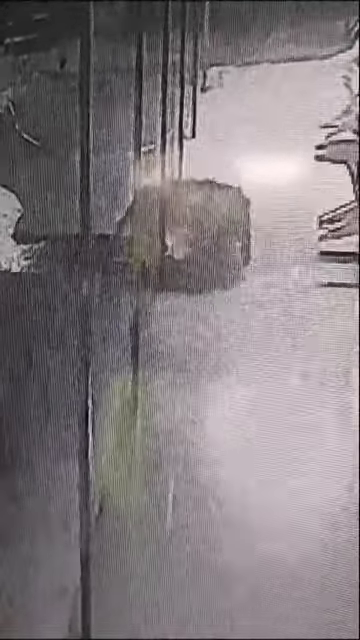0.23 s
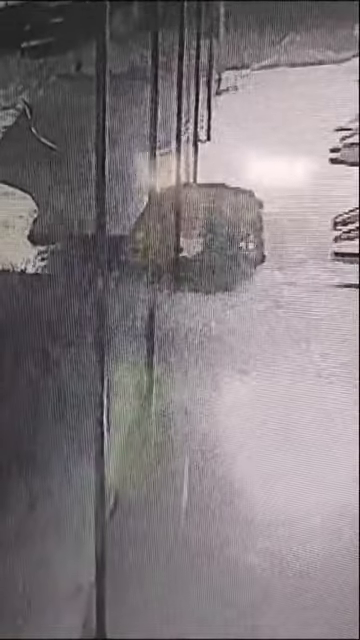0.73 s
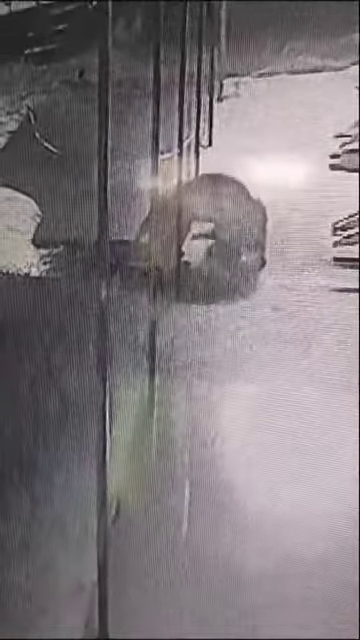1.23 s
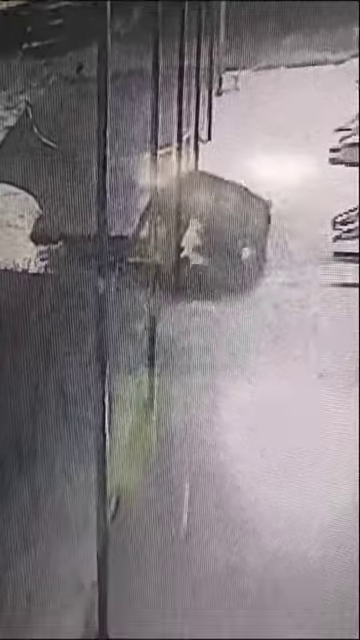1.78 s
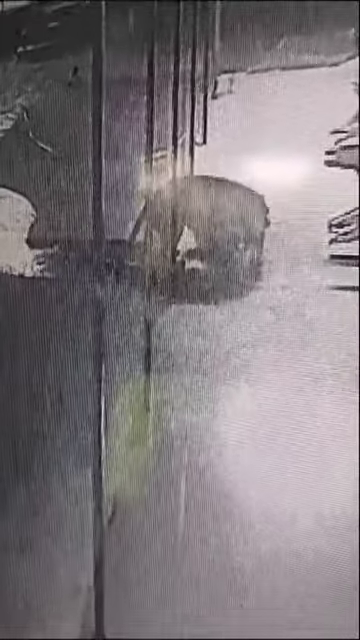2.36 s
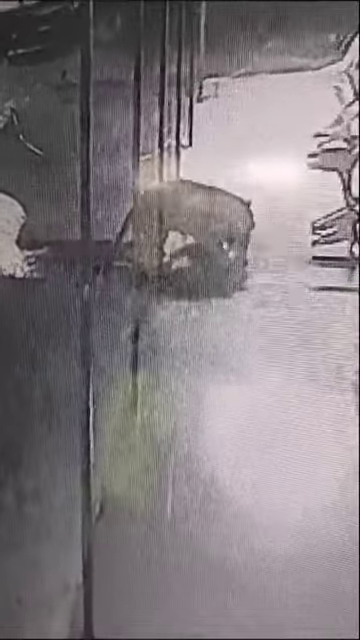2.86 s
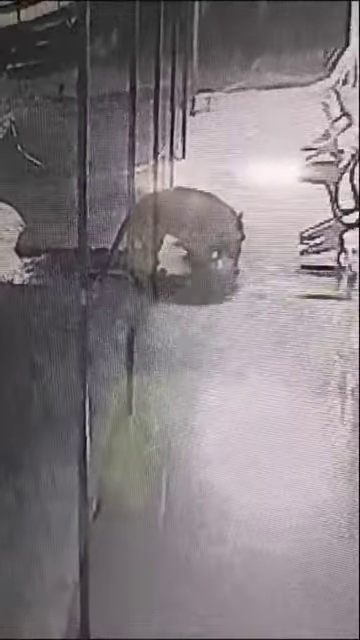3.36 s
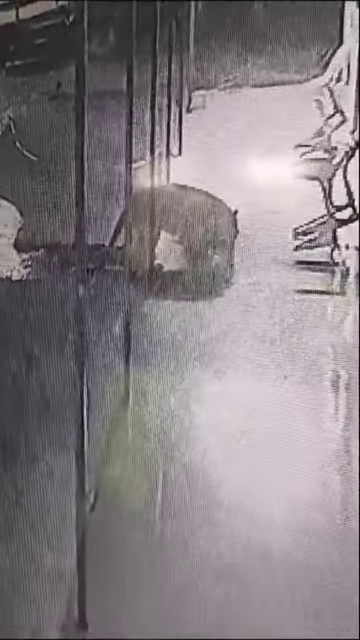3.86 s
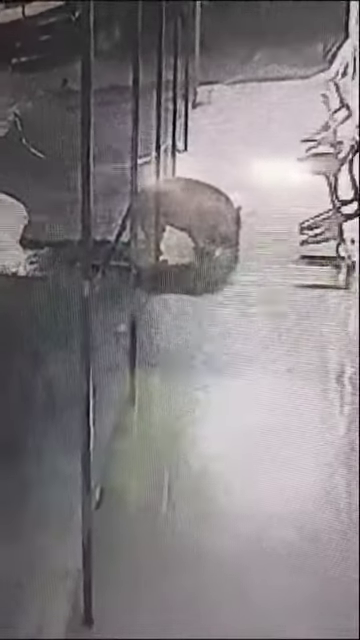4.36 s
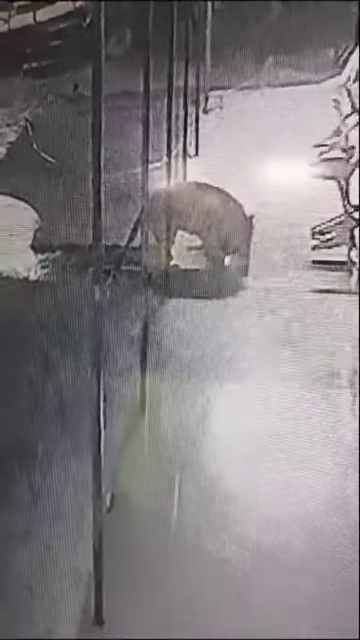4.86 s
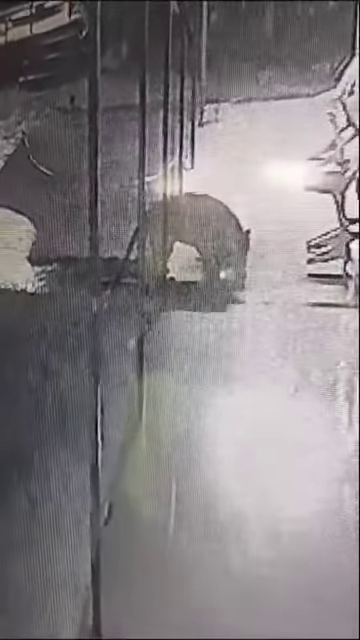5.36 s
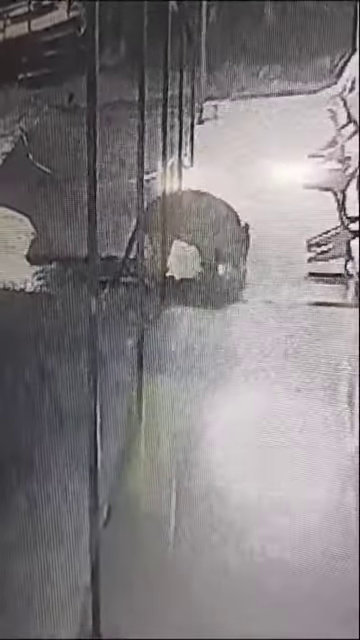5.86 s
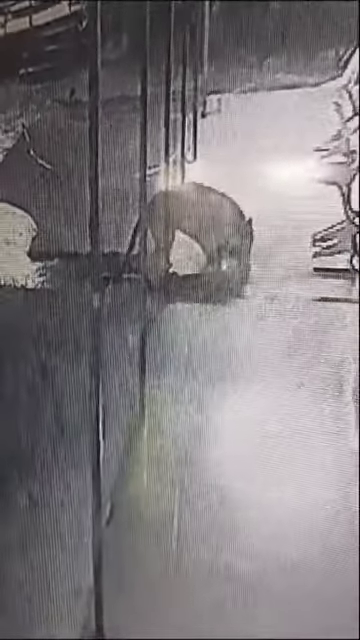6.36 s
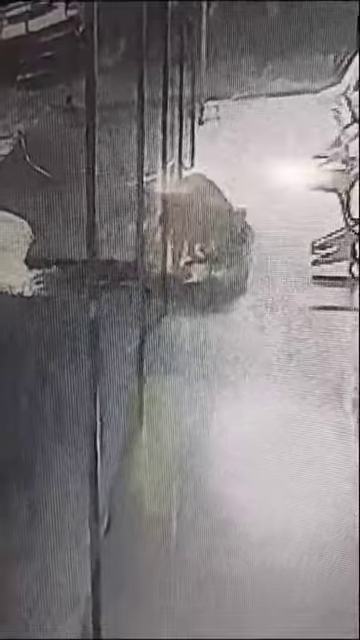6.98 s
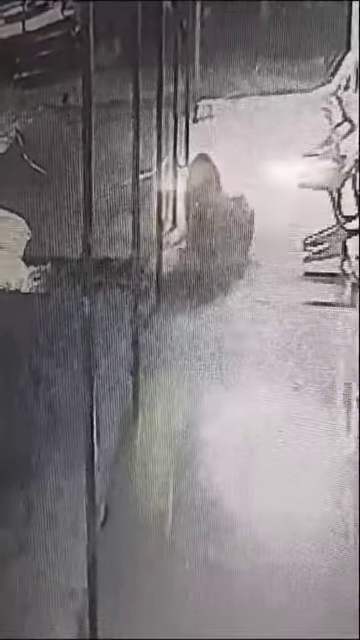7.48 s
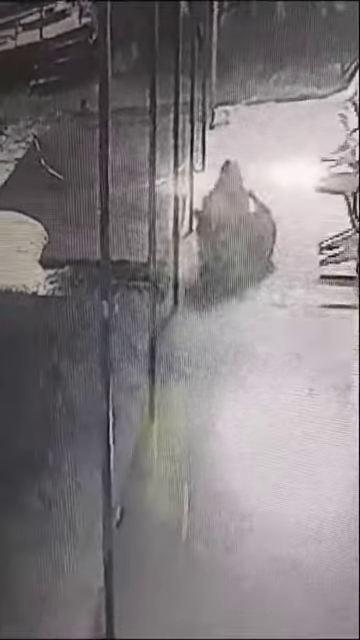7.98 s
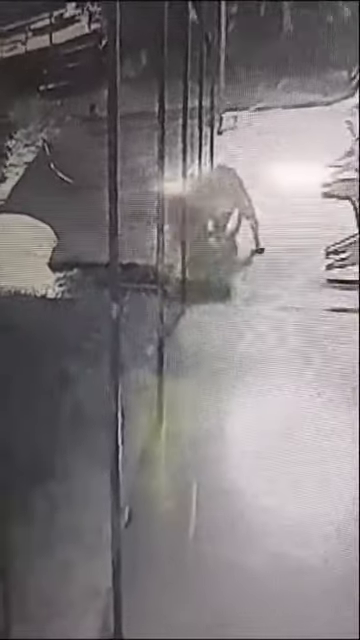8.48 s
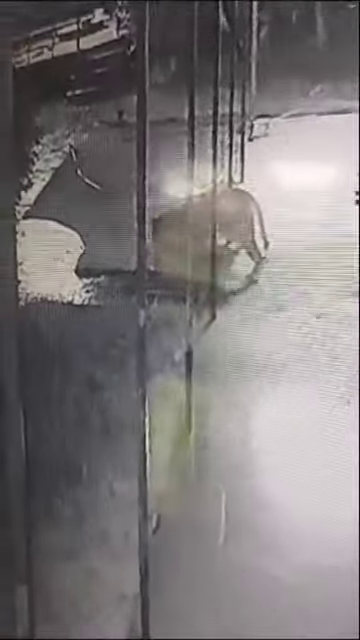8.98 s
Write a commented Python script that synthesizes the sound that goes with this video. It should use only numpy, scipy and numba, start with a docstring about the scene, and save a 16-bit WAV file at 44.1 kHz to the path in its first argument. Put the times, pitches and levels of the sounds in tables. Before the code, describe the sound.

A large wild cat snarls roughly with hiss and spittle in a slightly echoing place. Then, close by, it gives four deep sawing roars, each followed by a rasping in-breath, and ends on a long fading growl. A bird whistles faintly over a low outdoor rumble. Last, a dull security microphone picks up night hiss and two loud, hoarse yelps from a smaller animal.

```python
"""Three scenes joined by fades. First a big cat snarls in an echoing place: slow rough vocal folds, a
booming chest, hiss and spittle. Then it saws close by, roaring on the out-breath and rasping on the
in-breath while a bird whistles, and ends on a long growl. Last, a narrow-band security microphone
hears the night hiss and two hoarse yelps of a smaller animal that overload it.
Both animals' voices are fold pulses and air noise ringing the resonances of the airway."""
import sys
import numpy as np
from scipy import signal
from scipy.fft import rfft, irfft
from scipy.io import wavfile
from scipy.ndimage import uniform_filter1d
from numba import njit

SR = 44100
rng = np.random.default_rng(int(sys.argv[2]) if len(sys.argv) > 2 else 0)


def dump(signal):
    """Clip the signal to [-1, 1] and save it as 16-bit WAV at the path in sys.argv[1]."""
    limited = np.clip(np.atleast_2d(signal).T, -1, 1)
    pcm = np.round(limited * 32767).astype(np.int16)
    wavfile.write(sys.argv[1], SR, pcm)


N = 407043


def undb(db):
    return 10 ** (np.asarray(db) / 20)


def unit(x):
    return x / np.sqrt(np.mean(x ** 2))


def noise():
    return rng.standard_normal(N)


def stereo(mid, side):
    return np.array([mid + side, mid - side])


def play(calls):
    """Calls of (time_s, ...) rows to smooth control curves and a gate open during each call."""
    time_s, *columns = np.concatenate(calls).T
    t = np.arange(N) / SR
    gate = np.any([(t >= call[0][0]) & (t <= call[-1][0]) for call in calls], axis=0)
    curves = [uniform_filter1d(np.interp(t, time_s, c), size=260, mode="nearest") for c in columns]
    return curves, uniform_filter1d(1. * gate, size=300, mode="nearest")


def fade(rows):
    """Gain along (time_s, level_db) rows, silent outside them."""
    (db,), gate = play([rows])
    return gate * undb(db)


def swell(start_s, end_s, first_db, last_db, attack_s, release_s, edge_db):
    """Attack, hold and release as (time_s, level_db) rows."""
    return [(start_s, first_db + edge_db), (start_s + attack_s, first_db),
            (end_s - release_s, last_db), (end_s, last_db + edge_db)]


def wander(rate_hz=10):
    """Slow random drift, rms 1."""
    size = int(SR / rate_hz)
    return unit(uniform_filter1d(uniform_filter1d(noise(), size=size), size=size))


@njit
def bandpass(x, hz, width_hz):
    """State-variable filter, gain 1 at its moving centre."""
    y, band_state, low_state = np.empty(len(x)), 0., 0.
    for i in range(len(x)):
        g, damping = np.tan(np.pi * hz[i] / SR), width_hz[i] / hz[i]
        band = (band_state + g * (x[i] - low_state)) / (1 + g * (g + damping))
        band_state = 2 * band - band_state
        low_state += 2 * g * band
        y[i] = damping * band
    return y


def ring(x, hz, width_hz):
    """Steep resonance; roughly keeps the rms of white input."""
    hz, width_hz = hz + np.zeros(N), width_hz + np.zeros(N)
    once = bandpass(x + 1e-18, hz, width_hz)
    return bandpass(once, hz, width_hz) * np.sqrt(2 * SR / (np.pi * width_hz))


def cavity(x, modes):
    """Parallel (centre_hz, width_hz, gain_db) resonances of alternating sign, power near 1."""
    gains = undb([db for _, _, db in modes])
    bands = ((-1) ** k * gains[k] * ring(x, hz, width) for k, (hz, width, _) in enumerate(modes))
    return sum(bands) / np.linalg.norm(gains)


def restless(modes, scale=1):
    """Scaled mode frequencies drift: tongue and lips never hold still."""
    return [(scale * hz * (1 + .022 * wander()), width, db) for hz, width, db in modes]


@njit
def closures(hz, rough, scatter):
    """One pulse per fold closure, power near 1; roughness varies period and size."""
    pulses, phases = np.zeros(len(hz) + 1), np.empty(len(hz))
    phase, cycle = 0., 0
    for i in range(len(hz)):
        step = hz[i] * np.exp(rough[i] * scatter[cycle, 0]) / SR
        phase += step
        if phase >= 1:
            phase, cycle = phase - 1, cycle + 1
            size = np.exp(rough[i] * scatter[cycle, 1]) * np.sqrt(SR / hz[i])
            pulses[i] += size * phase / step
            pulses[i + 1] += size * (1 - phase / step)
        phases[i] = phase
    return pulses[:-1], phases


def folds(hz, rough, jitter, shimmer):
    """Vocal fold pulses and their cycle phase."""
    scatter = rng.standard_normal((N // 40, 2)) * [jitter, shimmer]
    return closures(hz, rough + np.zeros(N), scatter)


def breathy(pulses, phase, air_share, puff_cycles):
    """Pulses mixed with air noise that puffs once a cycle."""
    air_share = np.clip(air_share, 0, 1)
    puffs = unit(np.exp(-phase / puff_cycles) * noise())
    return np.sqrt(1 - air_share) * pulses + np.sqrt(air_share) * puffs


def uneven(phase, scatter_db=2.2):
    """A random gain per fold cycle."""
    cycle = np.cumsum(np.diff(phase, prepend=0) < 0)
    return undb(scatter_db * rng.standard_normal(N // 40))[cycle]


def taps(time_s, level_db):
    """One impulse per event."""
    x = np.zeros(N)
    x[(time_s * SR).astype(int)] = undb(level_db)
    return x


def pops(events, rise_s, fall_s):
    """Short wet noise bursts, and the bright frequency of the latest one."""
    time_s, level_db, bright_hz = np.transpose(events)
    t = np.arange(SR // 20) / SR
    shape = (1 - np.exp(-t / rise_s)) * np.exp(-t / fall_s)
    bursts = signal.fftconvolve(taps(time_s, level_db), shape)[:N] * noise()
    latest = np.maximum(np.searchsorted(time_s, np.arange(N) / SR) - 1, 0)
    return bursts, bright_hz[latest]


def glides(notes, peak_share, edge_db):
    """Sliding pure tones, loudest at peak_share of their length."""
    calls = []
    for start_s, end_s, from_hz, to_hz, db in notes:
        peak = (start_s + peak_share * (end_s - start_s), from_hz + peak_share * (to_hz - from_hz), db)
        calls.append([(start_s, from_hz, db + edge_db), peak, (end_s, to_hz, db + edge_db)])
    (hz, db), gate = play(calls)
    return gate * undb(db) * np.sqrt(2) * np.sin(2 * np.pi * np.cumsum(hz) / SR)


def coloured(spectrum):
    """Steady noise of the given spectrum, rms 1."""
    hz, db = np.transpose(spectrum)
    bin_hz = np.maximum(np.arange(N // 2 + 1) * SR / N, 1)
    gain = undb(np.interp(np.log(bin_hz), np.log(hz), db))
    return unit(irfft(rfft(noise()) * gain, N))


def echoes(x, t60_s):
    """Decaying wash of reflections, power gain 1."""
    t = np.arange(SR // 2) / SR
    tail = rng.standard_normal(len(t)) * undb(-60 * t / t60_s)
    return signal.fftconvolve(x, tail / np.linalg.norm(tail))[:N]


# Snarled breaths: start_s, end_s, voice_db, hiss_db,
# cheek_re_voice_db, mouth_re_voice_db, teeth_re_voice_db, top_re_hiss_db
SNARL_BREATHS = [(-.04, 0.516, -12, -25.5, -9, -0.86, -10.5, .5),
                 (0.543, 1.162, -15.5, -28.5, -5.5, -0.64, -9.5, 2),
                 (1.19, 1.75, -27, -28, -5.5, -1.57, -8.5, -5)]


def snarl_breaths():
    """The six level curves: each breath starts hard, sags and lets go."""
    voice, hiss, balance = [], [], []
    timing = dict(attack_s=.018, release_s=.075)
    voice_sag_db_per_s, hiss_sag_db_per_s = 16, 13
    for start_s, end_s, voice_db, hiss_db, *balance_db in SNARL_BREATHS:
        voice_end_db = voice_db - voice_sag_db_per_s * (end_s - start_s)
        hiss_end_db = hiss_db - hiss_sag_db_per_s * (end_s - start_s)
        voice.append(swell(start_s, end_s, voice_db, voice_end_db, edge_db=-11, **timing))
        hiss.append(swell(start_s, end_s, hiss_db, hiss_end_db, edge_db=-18, **timing))
        balance.append([(start_s, *balance_db), (end_s, *balance_db)])
    return [curve for calls in (voice, hiss, balance) for curve in play(calls)[0]]


# Chest under the snarl: time_s, fold_hz, chest_db, neck_db
SNARL_CHEST = [(0, 43.86, -21.5, -13.5), (.112, 44.3, -44, -10), (.23, 44.7, -2.5, -10),
               (.32, 44.08, -10.5, -14.5), (.45, 41.03, -15, -13.5), (.66, 48.67, -12.5, -25.5),
               (.76, 49.4, -19, -19), (.89, 45.68, -45.5, -27.5), (1.35, 44.34, -36, -27.5),
               (1.735, 42.5, -51, -27)]
# Throat opening and closing: time_s, lower_hz, upper_hz, lower_re_voice_db, upper_re_voice_db
SNARL_THROAT = [(0, 179, 378, -4, -1), (.2, 181, 383, -5, 2), (.42, 169, 425, -7.5, -2.5),
                (.56, 190, 335, -3.5, -5), (.72, 195, 303, 0, -4.5), (.88, 202, 277, 4, -13),
                (1.03, 162, 290, -2, -5.5), (1.3, 174, 302.8, -6.5, -6)]
# Teeth and hiss resonances: centre_hz, width_hz, gain_db
TEETH_MODES = [(1119, 110, 14.5), (1522, 210, 18), (1883, 480, 17.5), (2700, 840, 11.5)]
HISS_MODES = [(3310, 810, -4), (4170, 750, -2), (4950, 910, -6.5), (6750, 2100, -1.5), (7650, 850, -5),
              (8600, 7500, 3.5), (12800, 12000, 0)]
# Fade-out: time_s, gain_db
SNARL_FADE = [(0, -1), (1.35, 0), (1.53, -6), (1.7, -24.5), (1.735, -45)]


def snarl():
    """Slow rough folds under a rush of air; the chest booms at the fold rate."""
    (fold_hz, chest_db, neck_db), _ = play([SNARL_CHEST])
    (lower_hz, upper_hz, lower_db, upper_db), _ = play([SNARL_THROAT])
    voice_db, hiss_db, cheek_db, mouth_db, teeth_db, top_db = snarl_breaths()
    pulses, phase = folds(fold_hz, rough=1, jitter=.0376, shimmer=.038)
    voiced = breathy(pulses, phase, air_share=.65, puff_cycles=.44)
    airy = breathy(pulses, phase, air_share=.91, puff_cycles=2)
    chest = undb(chest_db) * np.sqrt(2) * np.sin(2 * np.pi * phase)
    neck = undb(neck_db) * ring(voiced, 101, 69)
    throat = undb(lower_db) * ring(voiced, lower_hz, 55) + undb(upper_db) * ring(airy, upper_hz, 157)
    cheek = undb(cheek_db) * ring(airy, 646, 80)
    mouth = undb(mouth_db) * (.29 * ring(airy, 874, 81) + .5 * ring(airy, 895, 260))
    teeth = undb(teeth_db) * cavity(airy, restless(TEETH_MODES))
    voice = undb(voice_db) * (throat + cheek + mouth + teeth) + neck
    hiss = undb(hiss_db - 2) * cavity(noise(), restless(HISS_MODES[:5])) + spittle()
    top = undb(hiss_db + top_db - 3) * cavity(noise(), HISS_MODES[5:])
    to_walls = undb(-6) * voice + undb(-11) * chest + undb(-12) * hiss + undb(-16) * top
    return fade(SNARL_FADE) * stereo(chest + voice + hiss + top, echoes(to_walls, t60_s=.17))


# Spittle crackles: time_s, level_db, bright_hz
SPITS = [(0.1246, -9.5, 7450), (0.1744, -11, 4070), (0.198, -8, 3870), (0.2219, -10, 7400),
         (0.248, -14.5, 3750), (0.2742, -12.5, 3830), (0.3004, -8.5, 6700), (0.334, -17, 8150),
         (0.3565, -19.5, 3624), (0.389, -11.5, 5430), (0.4125, -9.5, 4080), (0.448, -14, 5340),
         (0.59, -14, 6504), (1.1992, -45, 6896), (1.2176, -16, 7300)]


def spittle():
    """Crackles between the teeth, each with its own colour."""
    bursts, bright_hz = pops(SPITS, rise_s=.0009, fall_s=.0059)
    return .5 * ring(bursts, bright_hz, 550) + .53 * cavity(bursts, HISS_MODES)


# Background level: time_s, level_db
YARD_FADE = [(1.73, -76), (1.8, -47), (5.8, -42.5), (6.3, -42), (6.62, -62.5)]
# Background spectrum: freq_hz, density_db
YARD_SPECTRUM = [(18, -62), (30, -3.5), (164, -6.5), (299, -20.5), (379, -15.5), (897, -22), (1080, -24),
                 (2180, -30.5), (2490, -33), (7460, -37.5), (15500, -40)]


def yard():
    """Low rumble with a faint wide hiss behind the sawing."""
    rumble = coloured(YARD_SPECTRUM)
    hiss = undb(-13) * cavity(noise(), [(400, 900, .5), (6300, 4000, 2)])
    return fade(YARD_FADE) * stereo(rumble, hiss)


# Out-breath roars: start_s, length_s, attack_s, throat_db, full_pull_fold_hz, mouth_re_throat_db
ROARS = [(1.743, 0.27, .045, -23, 62.88, -11), (2.443, .36, .012, -7, 68.38, -8),
         (3.253, 0.36, 0.0093, -7, 63.48, -13), (4.129, .39, .01, -7, 65.64, -12)]
# Course after the attack: time_share, effort_db, fold_pull, roughness, rasp_db, air_db
ROAR_SHAPE = [(0, -1, .82, .5, -24.5, -33.5), (.22, 0.5, .99, .3, -28.5, -32),
              (.48, -0.4, .82, .3, -23.5, -28.5), (.74, -4.5, .3, .5, -27, -38.5),
              (.95, -18, .05, .5, -29, -40), (1.12, -48, .01, .5, -26, -34)]


def roars():
    """Calls for cat_voice: tight folds beat faster and lift throat, mouth and palate, then slacken."""
    share, effort_db, pull, rough, rasp_db, air_db = np.transpose(ROAR_SHAPE[:1] + ROAR_SHAPE)
    effort_db[0] = -17.5  # foot of the attack
    slack_hz, teeth_hz, droop = 40.14, 3642, 0
    throat_hz, mouth_hz, palate_hz = 148.8 + 60.3 * pull, 578.7 + 88.3 * pull, 1581 + 90 * pull
    calls = []
    for start_s, length_s, attack_s, db, tight_hz, mouth_re_throat_db in ROARS:
        time_s = np.r_[start_s, start_s + attack_s + (length_s - attack_s) * share[1:]]
        fold_hz = slack_hz + (tight_hz - slack_hz) * pull
        throat_db = db + effort_db
        mouth_db = db + mouth_re_throat_db + 1.78 * effort_db
        columns = np.broadcast_arrays(time_s, fold_hz, rough, droop, throat_db, throat_hz, mouth_db,
                                      mouth_hz, throat_db + rasp_db, palate_hz, teeth_hz,
                                      throat_db + air_db)
        calls.append(np.transpose(columns))
    return calls


# Palate and teeth resonances: freq_ratio, width_hz, gain_db
PALATE_RATIOS = [(.8, 128.6, 0.5), (1.004, 118, 9), (1.26, 180, 10), (1.469, 191, 1)]
TEETH_RATIOS = [(0.819, 322, -8), (1.002, 368, -1.5), (1.19, 370.4, -10)]
# Leaking air: centre_hz, width_hz, gain_db
AIR_MODES = [(4990, 1140, -1), (7550, 2300, -6.5), (12100, 11000, -15)]
# Puff of air in the growl: time_s, level_db
SNORT = [(6.12, -52), (6.15, -36), (6.19, -69)]


def cat_voice(calls):
    """Fold pulses ring chest, throat, mouth, palate and teeth; air leaks past rough folds."""
    (fold_hz, rough, droop, throat_db, throat_hz, mouth_db, mouth_hz,
     rasp_db, palate_hz, teeth_hz, air_db), gate = play(calls)
    pulses, phase = folds(fold_hz, rough, jitter=.16, shimmer=.6)
    voiced = breathy(pulses, phase, air_share=.81 * rough, puff_cycles=1)
    airy = breathy(pulses, phase, air_share=.2 + 2 * rough, puff_cycles=.55)
    # A drooping head lowers and damps the throat, opens the chest and muffles the palate.
    drooped_hz = throat_hz * (1 - .4 * droop)
    throat = undb(-22) * ring(ring(voiced, drooped_hz, 60 + 40 * droop), drooped_hz, 190)
    chest = undb(-23 + 3.3 * droop) * ring(voiced, 77.5, 59)
    mouth = undb(.5 - 35 * droop + 2.5 * wander()) * ring(voiced, mouth_hz, 86)
    mouth += .8 * droop * ring(voiced, 805, 75) + .27 * ring(airy, 422, 160) + .52 * ring(airy, 840, 370)
    palate = undb(-7 * droop) * cavity(uneven(phase) * airy, restless(PALATE_RATIOS, palate_hz))
    teeth = undb(-3 + 8.1 * droop) * cavity(uneven(phase) * airy, restless(TEETH_RATIOS, teeth_hz))
    ticks = undb(-13.5) * ring(uneven(phase) * pulses, 2600, 2700)
    rasp = palate + teeth + ticks + undb(-6) * ring(airy, 1150, 500)
    air = cavity(breathy(pulses, phase, air_share=.9, puff_cycles=1), AIR_MODES)
    voice = undb(throat_db) * (throat + chest) + undb(mouth_db) * mouth + undb(rasp_db) * rasp
    return gate * (voice + (undb(air_db) + fade(SNORT)) * air)


# In-breaths: start_s, end_s, first_db, last_db
GASPS = [(2.135, 2.433, -15.5, -6), (2.92, 3.246, -14.5, -6.5), (3.785, 4.107, -15, -6),
         (4.797, 5.281, -20, -22)]
# In-breath resonances: centre_hz, width_hz, gain_db
GASP_THROAT = [(78, 34, -9.5), (159, 54.4, 1.5), (295, 51, -15.5)]
GASP_MOUTH = [(611, 98, 3.5), (884, 170, -7.5)]
GASP_RASP = [(1420, 470, -9.5), (2070, 1040, 5), (3190, 350, -19.5), (3700, 620, -2.5), (5090, 880, -6),
             (7360, 3600, -10), (12000, 5000, -32)]
# Slack folds slapping shut: time_s, level_db
FOLD_SLAPS = [(2.089, -17.5), (2.168, -11), (2.177, -7), (2.227, -3.5), (2.301, -23), (2.347, -7),
              (2.867, -15), (2.954, -3), (3.004, -3), (3.053, -4), (3.107, -3), (3.13, 3), (3.149, -2),
              (3.187, -14), (3.799, -11), (3.828, -5), (3.877, -6), (3.955, 0.5), (3.997, -0.5),
              (4.041, -2), (4.821, -8.5), (4.833, -8), (4.91, -11), (4.976, -5.5), (5.038, -7),
              (5.093, -14.5), (5.159, -32), (5.187, -7)]


def gasps():
    """Air drawn in flutters the slack folds unevenly; the hardest slaps ring the throat."""
    (effort_db,), gate = play([swell(*row, attack_s=.018, release_s=.059, edge_db=-22) for row in GASPS])
    pulses, phase = folds(hz=np.full(N, 38.), rough=.99, jitter=.37, shimmer=.64)
    air = breathy(pulses, phase, air_share=.92, puff_cycles=.79)
    throat = undb(effort_db - 9.5) * cavity(air, GASP_THROAT)
    mouth = undb(1.53 * effort_db - 18) * cavity(air, GASP_MOUTH)
    rasp = undb(1.14 * effort_db - 29.5) * cavity(air, GASP_RASP)
    impacts = taps(*np.transpose(FOLD_SLAPS))
    slaps = undb(15.5) * cavity(impacts, GASP_THROAT) + undb(-8.5) * cavity(impacts, GASP_MOUTH)
    return gate * (throat + mouth + rasp) + slaps


# Wet clicks: time_s, level_db, bright_hz
MOUTH_CLICKS = [(2.3008, -17.5, 2100), (2.7708, -26, 1900), (2.9442, -33, 2182), (3.0445, -40, 2460),
                (3.1492, -36, 1800), (3.1914, -27.5, 2370), (3.914, -23, 2426), (4.0003, -28, 2074),
                (4.0387, -18.5, 3742), (4.8135, -40.5, 5200), (4.8978, -25, 2200), (4.9667, -25, 2070),
                (5.0265, -42, 5200), (5.0913, -36, 1930), (5.1275, -39, 2170)]


def mouth_clicks():
    """Wet bursts ring the mouth, each with its own bright band."""
    bursts, bright_hz = pops(MOUTH_CLICKS, rise_s=.0003, fall_s=.0049)
    mouth = .27 * cavity(bursts, GASP_RASP) + .15 * cavity(bursts, GASP_MOUTH)
    return .88 * ring(bursts, bright_hz, 600) + mouth


# Bird notes: start_s, end_s, from_hz, to_hz, level_db
BIRD_NOTES = [(2.35, 2.42, 4600, 3600, -50), (2.795, 2.88, 4400, 3050, -53), (4.667, 4.72, 4450, 4680, -54),
              (4.732, 4.795, 4250, 3350, -56), (5.25, 5.297, 2550, 4100, -41),
              (5.297, 5.316, 4000, 3600, -38), (5.316, 5.338, 3600, 4100, -36),
              (5.346, 5.4, 4000, 2420, -41), (5.41, 5.45, 2900, 4000, -45), (5.85, 5.89, 4580, 4850, -56),
              (6.25, 6.285, 4350, 4660, -58), (6.285, 6.35, 4660, 3860, -58), (6.51, 6.55, 2900, 3200, -60)]


def bird():
    """Thin gliding whistles that waver in level."""
    return glides(BIRD_NOTES, peak_share=.3, edge_db=-9.5) * undb(2.5 + 2.5 * wander())


# Long growl: time_s, fold_hz, throat_db, throat_hz, head_droop, jaw_closure, roughness
GROWL = [(5.322, 39.58, -28.5, 172, .02, 0.13, .25), (5.372, 40, -13.5, 192.5, 0.01, .01, 0.3),
         (5.516, 45.1, -10.5, 186, 0.09, 0.01, 0.13), (5.618, 45.85, -11, 170.5, 0.01, 0.1, 0.12),
         (5.77, 42.13, -15, 157, .25, 0.24, .16), (5.914, 38.58, -20, 146, 0.4, .5, .12),
         (6.11, 36.65, -21, 151.7, 0.55, 0.44, .14), (6.264, 34.45, -26, 151.8, 0.53, 0.65, .16),
         (6.486, 37.43, -34.5, 167.2, 0.08, 1, 0.21), (6.618, 38.26, -51, 183, 0.05, .99, 0.1)]


def growl():
    """Call for cat_voice: the closing jaw dims and lowers the mouth's resonance and shifts the rasp."""
    time_s, fold_hz, throat_db, throat_hz, droop, jaw, rough = np.transpose(GROWL)
    mouth_db, rasp_db, air_db = throat_db - 12.5 - 19 * jaw, throat_db - 19.5, throat_db - 37
    mouth_hz, palate_hz, teeth_hz = 656 - 200 * jaw, 1669 + 170 * jaw, 3642 - 520 * jaw ** 3
    return np.transpose([time_s, fold_hz, rough, droop, throat_db, throat_hz, mouth_db, mouth_hz,
                         rasp_db, palate_hz, teeth_hz, air_db])


# Night level: time_s, level_db
NIGHT_FADE = [(6.64, -67), (6.75, -46), (7.26, -31.5), (7.54, -36), (8.85, -35), (9.23, -37)]
# Night spectrum: freq_hz, density_db
NIGHT_SPECTRUM = [(15, -22), (25, -11), (55, 2), (128, -5.5), (159, 5), (192, -8), (232, -7), (461, -11.5),
                  (598, -18.5), (6550, -30), (7200, -34.5), (9360, -84), (15800, -120)]


def night():
    """Hiss and a faint wavering hum."""
    hum = undb(-14) * ring(noise(), hz=157, width_hz=10)
    return fade(NIGHT_FADE) * (coloured(NIGHT_SPECTRUM) + hum)


def yelp_part(start_s, peak_s, end_s, from_hz, to_hz, peak_db, rise_db, settled_hz, upper_re_db, rough):
    """Swells as the mouth settles, then dies; the upper resonance comes late and lasts longer."""
    mouth_fall_db_per_s, upper_fall_db_per_s = 251, 167
    time_s, fall_s = [start_s, peak_s, end_s], end_s - peak_s
    fold_hz = np.interp(time_s, [start_s, end_s], [from_hz, to_hz])
    mouth_db = peak_db - np.array([rise_db, 0, mouth_fall_db_per_s * fall_s])
    upper_db = peak_db + upper_re_db - np.array([rise_db + 13, 0, upper_fall_db_per_s * fall_s])
    mouth_hz = [1.1 * settled_hz, settled_hz, settled_hz]
    return np.transpose([time_s, fold_hz, mouth_db, mouth_hz, upper_db, [rough] * 3])


# Parts of the two yelps: start_s, peak_s, end_s, from_hz, to_hz,
# peak_db, rise_db, mouth_hz, upper_re_mouth_db, roughness
YELP_PARTS = [(7.11, 7.126, 7.17, 268, 290, -15, 32, 1360, -30, 0.52),
              (7.17, 7.259, 7.45, 290, 235, -5, 12.5, 1306, -10.5, 0.85),
              (7.415, 7.483, 7.57, 215, 218, -29.5, -3, 1370, -21, 0.65),
              (8.462, 8.49, 8.52, 234.8, 255.3, -6, 16, 1224, -8.5, 0.47),
              (8.521, 8.552, 8.62, 225, 220, -25, -2, 1225, -0.5, 0.84),
              (8.632, 8.707, 8.722, 243, 298, -13, 8, 1264, -28.5, 0.22),
              (8.728, 8.796, 8.89, 335, 355, -28.5, -1.5, 1300, -25, 0.7)]
# Soft whimpers and pure squeals: start_s, end_s, from_hz, to_hz, level_db
WHIMPERS = [(7.06, 7.13, 262.4, 295, -26), (8.7, 8.76, 566, 723, -28.5)]
SQUEALS = [(7.203, 7.228, 1430, 1321, -3), (7.228, 7.292, 1299, 1043, 0.3), (8.497, 8.52, 1165, 1392, 2)]


def yelps():
    """Hoarse high folds ring two mouth resonances and break into a squeal; nearby walls echo."""
    (fold_hz, mouth_db, mouth_hz, upper_db, rough), gate = play([yelp_part(*row) for row in YELP_PARTS])
    pulses, phase = folds(fold_hz, rough, jitter=.06, shimmer=.4)
    hoarse = breathy(pulses, phase, air_share=rough / 2, puff_cycles=1)
    mouth = undb(mouth_db - 17) * ring(ring(hoarse, mouth_hz, 540), mouth_hz, 540)
    upper = undb(upper_db - 11.5) * ring(ring(hoarse, 2322, 660), 2322, 660)
    whimpers = glides(WHIMPERS, peak_share=.31, edge_db=-13)
    squeals = glides(SQUEALS, peak_share=.28, edge_db=-12)
    direct = gate * (mouth + upper) + whimpers + squeals
    return direct + undb(-24.5) * echoes(direct, t60_s=.72)


def security_microphone(x, cutoff_hz=7250):
    """Narrow band: a steep low-pass."""
    return signal.sosfilt(signal.ellip(8, .2, 60, cutoff_hz, fs=SR, output="sos"), x)


def scene():
    """Snarl, close sawing in the yard, yelps at night."""
    close = cat_voice(roars() + [growl()]) + gasps() + mouth_clicks() + bird()
    sawing = stereo(close, undb(-27.5) * echoes(close, t60_s=.06)) + yard()
    night_yelps = security_microphone(yelps() + night())
    return snarl() + sawing + night_yelps


def record(dry):
    """The loudest peaks clip flat, then the top is cut."""
    cutoff_hz = 15600
    lowpass = signal.ellip(12, .2, 80, cutoff_hz, fs=SR, output="sos")
    return signal.sosfilt(lowpass, np.clip(dry, -.97, .97))


dry = scene()
out = record(dry)
dump(out)
```